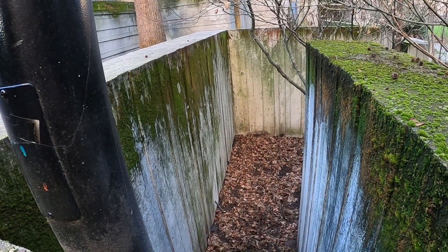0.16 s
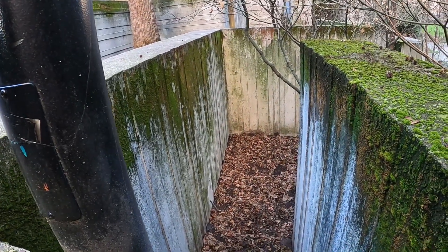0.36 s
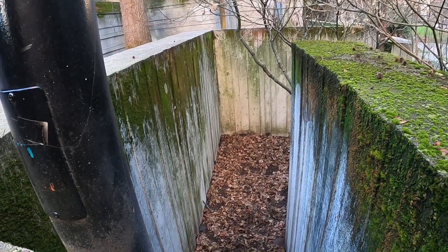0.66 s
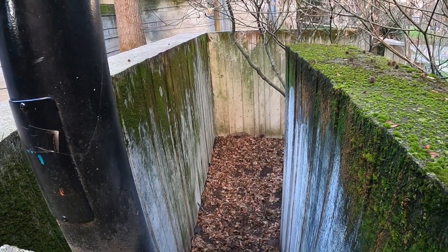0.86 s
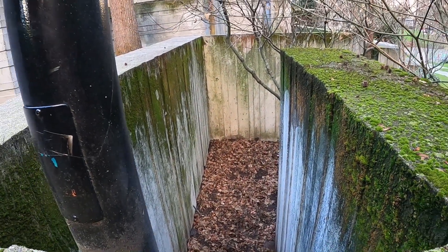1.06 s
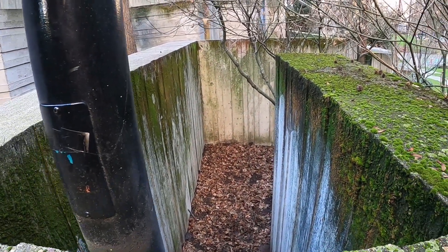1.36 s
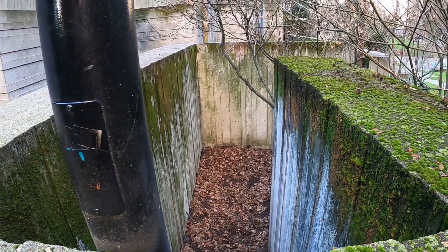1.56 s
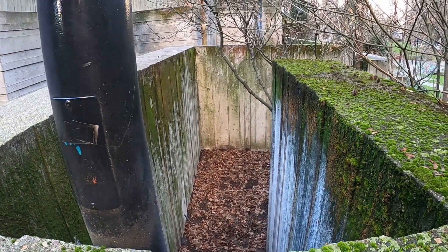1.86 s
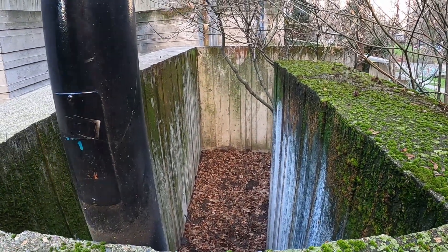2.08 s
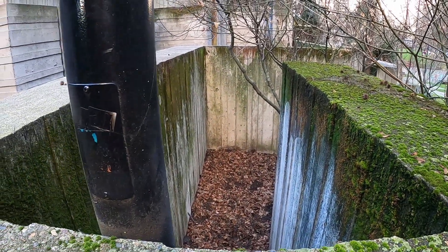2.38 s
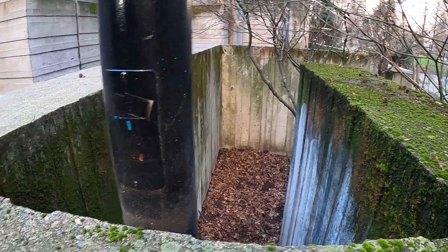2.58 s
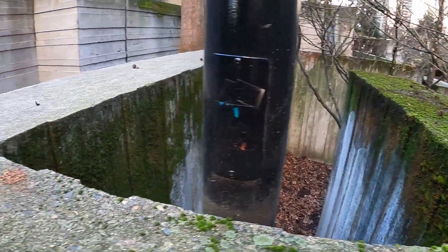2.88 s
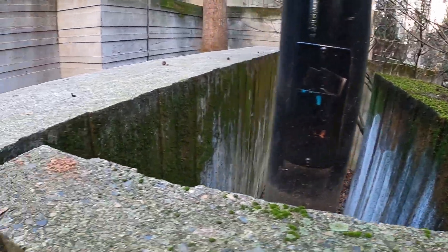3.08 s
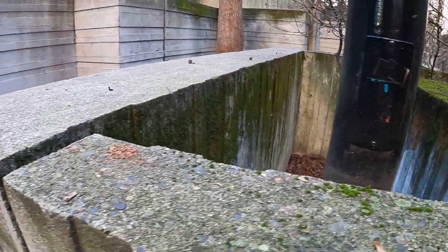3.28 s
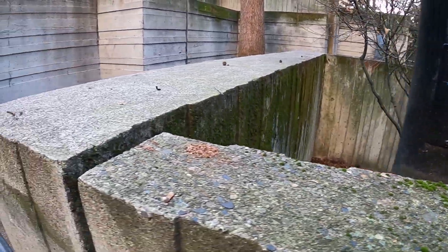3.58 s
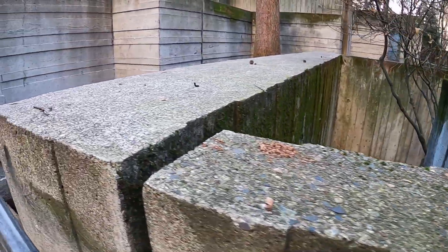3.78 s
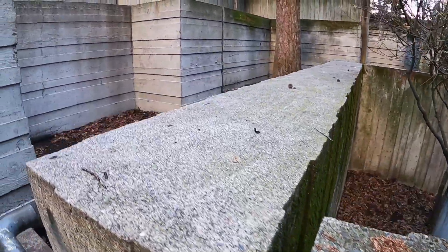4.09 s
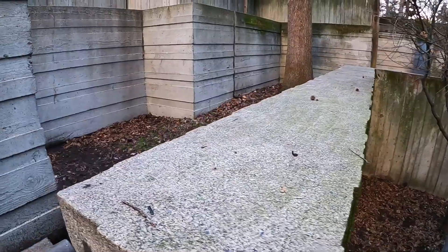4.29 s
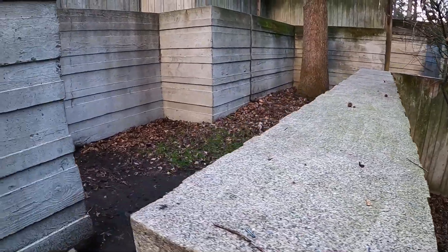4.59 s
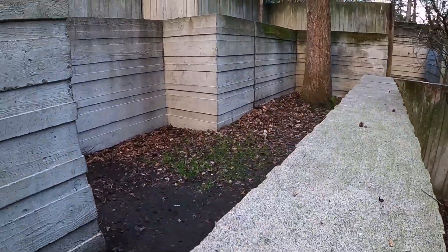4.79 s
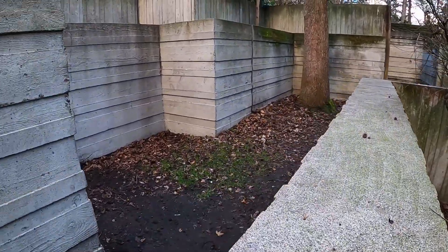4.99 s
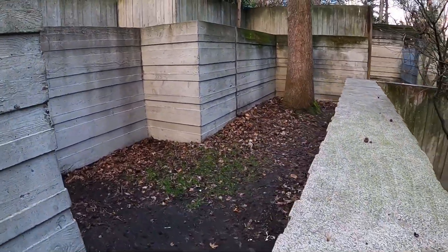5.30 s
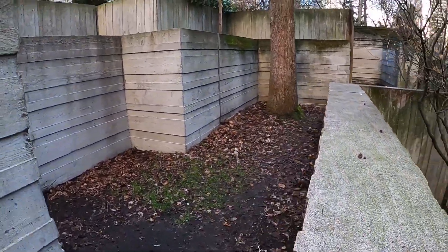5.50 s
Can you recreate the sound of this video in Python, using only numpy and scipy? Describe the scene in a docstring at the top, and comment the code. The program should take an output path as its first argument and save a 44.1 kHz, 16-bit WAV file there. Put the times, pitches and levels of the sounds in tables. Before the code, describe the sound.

Bass-heavy traffic rumble dominates, pulsing and dipping as several engines drift in pitch. Broad muffled road hiss swells around one second and eases near three. Tiny birds chirp in short glides, first centred, then left as the camera turns over mossy concrete. Barely audible ticks, one blunt handling thump just before four seconds, and a faint leafy rustle at the end. Narrow stereo camera microphones outdoors.

```python
"""Engines on a freeway drone and beat against each other, heard from a walled park above the road.
Each engine is a slightly wavering tone; a passing truck adds harmonics and a turbo whine of narrow hiss.
Under them lies a broad roar of tyres, made of filtered noise and a little louder on the left.
Small birds chip in gliding tones with an echo; noise bursts make faint ticks and a rustle.
A short damped ring makes one knock on the camera, which listens through two close microphone ports."""
import sys
import numpy as np
from scipy import signal
from scipy.fft import rfft, irfft
from scipy.io import wavfile

SR = 44100
rng = np.random.default_rng(int(sys.argv[2]) if len(sys.argv) > 2 else 0)


def field_ratio(decibels):
    """Amplitude ratio for a level in dB (20 dB per decade); scalars and array-likes work."""
    return 10 ** (np.asarray(decibels, dtype=float) / 20)


def int16_out(signal):
    """Quantize to a 16-bit WAV file."""
    q = np.round(np.clip(np.atleast_2d(signal).T, -1, 1) * 32767)
    wavfile.write(sys.argv[1], SR, q.astype(np.int16))


N = 249165
TIME = np.arange(N) / SR
BIN_HZ = np.arange(N // 2 + 1) * SR / N


def curve(table):
    """Draws straight lines between the rows, giving each column at every sample."""
    s, *columns = np.transpose(table)
    return [np.interp(TIME, s, column) for column in columns]


def over_hz(table, column):
    """Reads one column of a frequency table at every bin, on a logarithmic pitch scale."""
    table = np.array(table, float)
    return np.interp(np.log(BIN_HZ + 1), np.log(table[:, 0]), table[:, column])


def walk(rate_hz):
    """Smooth random motion of spread 1 that changes about rate_hz times a second."""
    spectrum = rfft(rng.standard_normal(N))
    slow = irfft(spectrum * np.exp(-(BIN_HZ / rate_hz) ** 2), N)
    return slow / slow.std()


def band(hz, width_hz):
    """Noise of rms 1 in a bell-shaped band."""
    spectrum = rfft(rng.standard_normal(N))
    noise = irfft(spectrum * np.exp(-((BIN_HZ - hz) / width_hz) ** 2), N)
    return noise / noise.std()


def engine(hz, db, waver_hz=0.27):
    """A firing tone: a sine whose pitch wavers slightly."""
    phase = 2 * np.pi * (np.cumsum(hz + waver_hz * walk(6)) / SR + rng.random())
    return np.sqrt(2) * field_ratio(db) * np.sin(phase)


def narrow_hiss(hz, db, smear_hz):
    """A tone blurred into a narrow band by two random motions a quarter cycle apart."""
    phase = 2 * np.pi * np.cumsum(hz) / SR
    return field_ratio(db) * (walk(smear_hz) * np.cos(phase) + walk(smear_hz) * np.sin(phase))


def whine(table, smear_hz):
    """A whistle blurred by many paths; it reaches each port differently."""
    hz, db = curve(table)
    return np.array([narrow_hiss(hz, db, smear_hz) for _ in range(2)])


# Ebb and flow of traffic, each column taken around its mean:
# t/s, level/dB of the tyre roar, brightness [dB per octave]
TRAFFIC_FLOW = [(.1, -0.75, -0.1), (.4, 0, -0.2), (.75, 2, -0.5), (1.0, 2, 0), (1.3, .6, -0.5),
                (1.65, 0.1, 0.5), (1.95, 1, 0), (2.3, -1.5, 0.25), (2.8, -0.5, 0.15), (3.1, -2, 1),
                (3.4, -1.2, 0.55), (3.8, 0, 0.64), (4.3, -0.5, -.5), (4.6, -0.4, 0), (4.9, 0, 0),
                (5.2, 1.1, -0.2), (5.55, 0.3, 1)]
# Road noise in the mean of both ports, before flow and flicker: f/Hz, level/dB [per Hz]
ROAD_SPECTRUM = [(22, -47), (38, -43), (52, -40), (65, -44), (95, -41), (160, -47), (250, -52), (450, -57),
                 (750, -56), (1000, -54), (1250, -58), (1600, -62.5), (2500, -73.3), (4000, -84),
                 (6000, -96.3), (7850, -103), (8200, -116), (11000, -129), (15000, -138)]
# How the two ports hear the road: f/Hz, likeness [0-1], left minus right level/dB
PORTS = [(100, .995, .1), (250, .98, .4), (400, .88, 1.0), (800, .62, 2.3), (2000, .6, 3.5),
         (3000, .54, 4.8), (4000, .23, 4.8), (5000, .15, .5), (9000, .15, 1.5)]


def road(flicker_db=0.67):
    """Tyres and exhausts of many vehicles: half-octave bands follow the flow and flicker a little alone."""
    right_lead_s = 5.5e-5
    roar_hz, rumble_share = 900, 0.93  # the low exhaust rumble follows the flow only in part
    like = np.clip(over_hz(PORTS, column=1), 0, 1)
    tilt = field_ratio(over_hz(PORTS, column=2) / 2)
    shared, left, right = rfft(rng.standard_normal((3, N)))
    shared = np.sqrt(like) * shared
    lead = np.exp(2j * np.pi * BIN_HZ * right_lead_s)
    left_port = tilt * (shared + np.sqrt(1 - like) * left)
    right_port = (shared * lead + np.sqrt(1 - like) * right) / tilt

    # the spectrum table sets the level of the mean of both ports
    mean_power = (tilt ** 2 + tilt ** -2 + 2 * like * lead.real) / 4
    pair = np.array([left_port, right_port])
    pair = pair * field_ratio(over_hz(ROAD_SPECTRUM, column=1)) * np.sqrt(SR / 2 / mean_power)

    roar_db, tilt_db = (column - column.mean() for column in curve(TRAFFIC_FLOW))
    half_octaves = 2 * np.log2((BIN_HZ + 1) / 16)  # counted up from 16 Hz
    out = 0
    for k in range(21):
        octaves = k / 2 - np.log2(roar_hz / 16)
        flow_db = roar_db + tilt_db * octaves if octaves > -1 else rumble_share * roar_db
        triangle = np.clip(1 - abs(half_octaves - k), 0, 1)
        out = out + field_ratio(flow_db + flicker_db * walk(5.9)) * irfft(pair * triangle, N)
    return out


# A brief rustle close by: middle t/s, half length [s], level/dB at the middle, centre f/Hz, width [Hz]
RUSTLE = (5.47, .06, -69, 7200, 2000)


def rustle():
    """Dry leaves or cloth shifting: a short swell of grainy hiss."""
    s, half_s, db, hz, width_hz = RUSTLE
    swell = np.exp(-((TIME - s) / half_s) ** 2)
    grain = field_ratio(db + 3 * walk(60))
    return grain * swell * np.array([band(hz, width_hz) for _ in range(2)])


# Faint ticks close by: t/s, level/dB at the peak of the burst, centre f/Hz
TICKS = [(.468, -63, 7600), (1.303, -69, 7800), (1.308, -62, 8000), (2.597, -62, 5500), (3.979, -39, 2000),
         (5.18, -66, 6500), (5.275, -65, 6500), (5.43, -62, 7000)]


def ticks(decay_s=.0015, spread=.2):
    """Each tick is a burst of noise, a few milliseconds long, that swells and dies quickly."""
    out = np.zeros(N)
    t = TIME[:SR // 40]
    burst = 4 * (1 - np.exp(-t / decay_s)) * np.exp(-t / decay_s)  # peaks at 1
    for s, db, hz in TICKS:
        i = int(s * SR)
        out[i:i + len(t)] += field_ratio(db) * burst * band(hz, spread * hz)[:len(t)]
    return out


# One knock on the camera body: t/s, ring f/Hz, decay [s], level/dB before onset and damping
KNOCK = (3.9768, 400, .0022, -5)


def knock():
    """A short push inward that the body damps within a few cycles."""
    s, hz, decay_s, db = KNOCK
    t = np.clip(TIME - s, 0, None)
    onset = 1 - np.exp(-2 * np.pi * hz * t)
    return -field_ratio(db) * np.exp(-t / decay_s) * np.sin(2 * np.pi * hz * t) * onset


# Bird chips: t/s, note name, middle f/Hz, level/dB before roughness and pan
CHIPS = [(.322, "rise", 4730, -55), (.786, "hook", 4600, -51), (1.584, "leap", 6450, -47),
         (1.67, "flat", 5060, -44), (1.744, "rise", 4750, -55), (1.83, "rise", 4700, -56),
         (1.902, "rise", 4270, -56), (3.372, "flat", 3680, -47), (3.385, "arch", 4200, -51),
         (3.6, "fall", 4150, -55), (3.64, "rise", 3520, -54), (3.74, "rise", 4520, -55),
         (3.795, "fall", 3950, -55), (3.848, "flat", 3500, -48), (4.712, "fall", 4400, -57),
         (4.837, "arch", 4120, -51), (4.95, "fall", 4150, -52), (5.024, "flat", 3700, -49),
         (5.143, "flat", 4660, -53), (5.278, "arch", 4290, -52), (5.612, "flat", 4180, -51)]
# Shape of each named note: start pitch, end pitch [shares of the middle pitch], length [s]
NOTES = {"rise": (.92, 1.08, .032), "fall": (1.07, .78, .042), "arch": (.73, .78, .035),
         "flat": (.97, 1.0, .016), "leap": (.74, 1.0, .024), "hook": (.98, .7, .046)}
# The birds move to the left as the camera turns away: t/s, left minus right level/dB
BIRD_PAN = [(2.5, 0), (3.4, 8.5)]


def birds(echo_s=.035, echo_db=-4):
    """Short gliding whistles with a smeared echo off the concrete walls."""
    rough, rough_hz = .5, 250
    chips = np.zeros((2, N))
    for s, note, hz, db in CHIPS:
        start, end, length = NOTES[note]
        u = np.arange(int(length * SR)) / (length * SR)
        # a parabola through start, middle and end pitch
        glide = start * (1 - u) * (1 - 2 * u) + 4 * u * (1 - u) + end * u * (2 * u - 1)
        swell = np.sqrt(2 * np.sin(np.pi * u))
        tone = np.sin(2 * np.pi * np.cumsum(hz * glide) / SR)
        i = int(s * SR)
        chips[:, i:i + len(u)] += field_ratio(db) * swell * tone
    pan_db = curve(BIRD_PAN)[0] * np.array([[.5], [-.5]])
    chips = chips * (1 + rough * walk(rough_hz)) * field_ratio(pan_db)
    t = TIME[:SR // 5]
    tails = rng.standard_normal((2, len(t))) * np.exp(-t / echo_s) / np.sqrt(echo_s * SR / 2)
    return chips + field_ratio(echo_db) * signal.fftconvolve(chips, tails, axes=1)[:, :N]


# A faint whistle, lower than the turbo whine: t/s, f/Hz, level/dB
WHISTLE = [(1.35, 3300, -75), (1.55, 3350, -57), (1.9, 3450, -57), (2.1, 3650, -58), (2.45, 3650, -59),
           (2.7, 3530, -57), (2.9, 3500, -75)]


def low_whistle():
    """A gliding whistle made of narrow hiss."""
    return whine(WHISTLE, smear_hz=90)


# A fainter engine: t/s, f/Hz, level/dB
FAINT_ENGINE = [(0, 80.2, -19.5), (.5, 80.1, -31), (.9, 81.26, -35), (1.3, 79.7, -28), (1.6, 82, -39),
                (1.9, 80.6, -34), (2.2, 79.3, -59.5)]


def faint_engine():
    """A single firing tone, higher than the others, that fades away."""
    return engine(*curve(FAINT_ENGINE))


# An engine coming on as the truck leaves: t/s, firing f/Hz, level/dB before the hum's fades, octave level/dB
COMING_ENGINE = [(2.3, 68.63, -44, -47.5), (2.8, 68.96, -28, -29), (3.6, 69.2, -26.5, -32.5),
                 (4.6, 68.7, -21, -32), (5.1, 68.26, -29, -33.5), (5.65, 69.76, -19, -36.5)]


def coming_engine(fade_db):
    """A firing tone that fades with the hum, and its octave that does not."""
    hz, tone_db, octave_db = curve(COMING_ENGINE)
    return field_ratio(fade_db) * engine(hz, tone_db) + engine(2 * hz, octave_db)


# A second heavy engine at a nearly even speed: t/s, f/Hz, level/dB before the hum's fades
EVEN_ENGINE = [(0, 60.5, -18), (.5, 60.5, -21), (1.1, 62.18, -20.5), (1.5, 62, -25.5), (3.1, 62.3, -27.5),
               (3.5, 62.2, -12.5), (3.9, 62.17, -10), (4.3, 62.49, -11), (4.6, 62.8, -13.5),
               (4.95, 62.42, -21), (5.25, 61.85, -11), (5.65, 63.3, -8.5)]


def even_engine(fade_db):
    """A low firing tone that fades with the hum and beats against the truck."""
    return field_ratio(fade_db) * engine(*curve(EVEN_ENGINE))


# Brief dips of the hum where the engine tones beat against each other: t/s, depth as level/dB
HUM_DIPS = [(.3, -8), (.8, -8), (1.18, -9.5), (1.77, -4.5), (1.96, -3.5), (2.32, -0.5), (2.68, -4),
            (3.4, -8.5), (3.7, -12), (4.1, -6), (4.54, -3.5), (4.83, -12), (5.03, -14), (5.42, -7)]


def hum_fade(flutter_db=0.45, dip_s=.04):
    """Level of the low hum in dB: a random flutter plus bell-shaped dips at set times."""
    dips_db = sum(db * np.exp(-((TIME - s) / dip_s) ** 2) for s, db in HUM_DIPS)
    return flutter_db * walk(6.2) + dips_db


# Turbo whine of the truck: t/s, f/Hz, level/dB
TURBO_WHINE = [(0, 7400, -84), (.7, 7550, -73), (1.4, 7680, -71), (2.2, 7700, -78), (2.7, 7650, -66),
               (3.0, 7520, -61), (3.25, 7330, -60), (3.42, 7200, -63), (3.6, 7120, -74), (4.0, 7100, -85)]


def turbo_whine():
    """The truck's high whine, a narrow hiss whose pitch rises and then drops."""
    return whine(TURBO_WHINE, smear_hz=230)


# The passing truck, gaining speed and then drawing away: t/s, firing f/Hz, firing level/dB before the
# hum's fades, octave level/dB at the peak of its throb, third harmonic level/dB
TRUCK = [(0, 64.3, -9, -27, -42), (.35, 66.02, -24.5, -28, -31), (.9, 66.4, -23, -17.5, -35.5),
         (1.06, 66.9, -12.5, -18.5, -34), (1.5, 67.15, -13.5, -22.5, -34), (2.2, 68.2, -10.5, -22, -40.5),
         (2.6, 67.4, -12.5, -23, -33.5), (3.2, 66.06, -8.5, -26, -29.5), (3.4, 65.58, -24, -22, -33.5),
         (4.2, 63.72, -29.5, -20, -49), (5, 63.3, -29.5, -26, -45.5), (5.65, 63, -31, -35, -33)]


def truck(fade_db):
    """Firing tone, throbbing octave, and a third harmonic scattered by uneven firings into a growl."""
    hz, tone_db, octave_db, third_db = curve(TRUCK)
    # the octave throbs as direct and echoed paths drift in and out of step
    throb_hz, throb_peak_s, echo = 2.7, 3.05, 0.48
    throb = abs(1 + echo * np.exp(2j * np.pi * throb_hz * (TIME - throb_peak_s))) / (1 + echo)
    firing = field_ratio(fade_db) * engine(hz, tone_db)
    octave = throb * engine(2 * hz, octave_db)
    growl = narrow_hiss(3 * hz, third_db, smear_hz=6)
    return firing + octave + growl


def engines():
    """The truck and three other engines; three of the low firing tones share one fade."""
    fade_db = hum_fade()
    return faint_engine() + coming_engine(fade_db) + even_engine(fade_db) + truck(fade_db)


def scene():
    """Road, small sounds of the park, whistles and engines added together."""
    nearby = rustle() + ticks() + knock() + birds()
    return road() + nearby + low_whistle() + turbo_whine() + engines()


def band_limit(x):
    """A steep low-pass at the top of the band."""
    return signal.sosfilt(signal.butter(12, 15700, fs=SR, output="sos"), x)


def record(dry, top=0.77):
    """The camera smoothly rounds the loudest peaks so that they stay below top."""
    rounded = dry / (1 + abs(dry / top) ** 6) ** (1 / 6)
    return band_limit(rounded)


dry = scene()
out = record(dry)
int16_out(out)
```